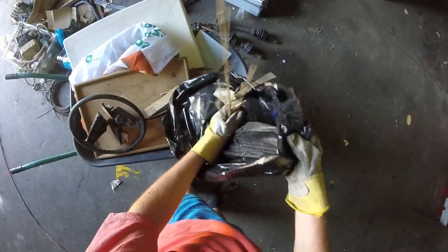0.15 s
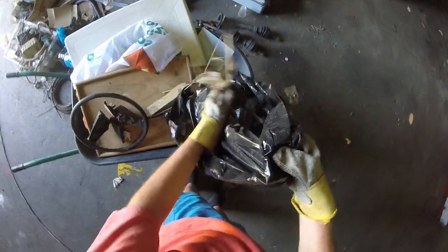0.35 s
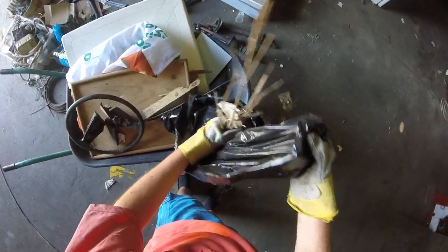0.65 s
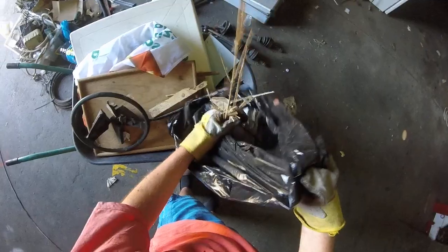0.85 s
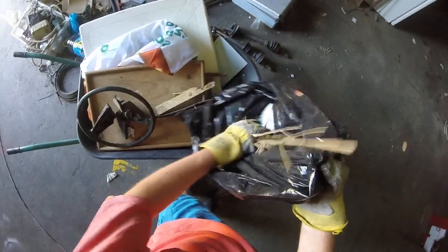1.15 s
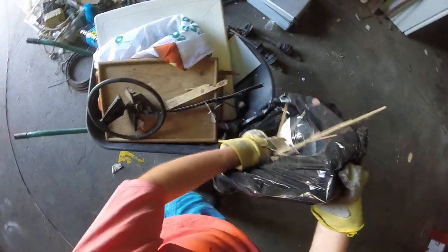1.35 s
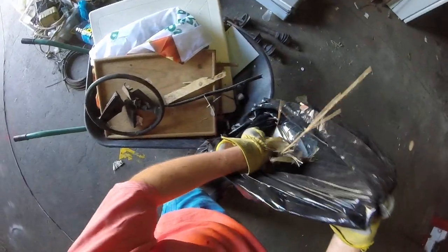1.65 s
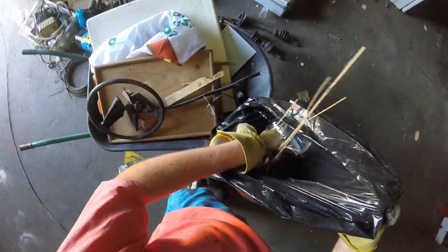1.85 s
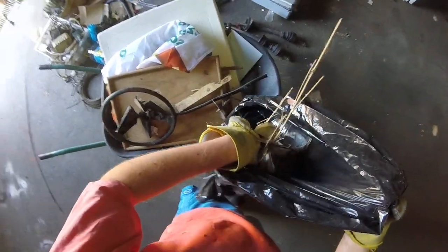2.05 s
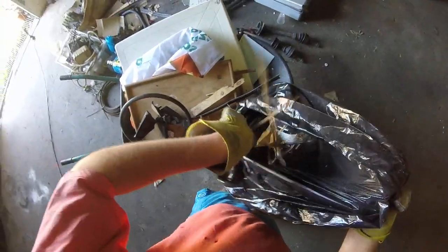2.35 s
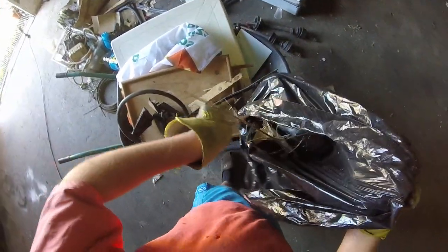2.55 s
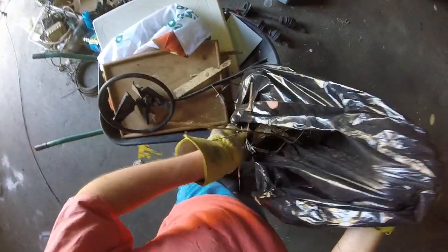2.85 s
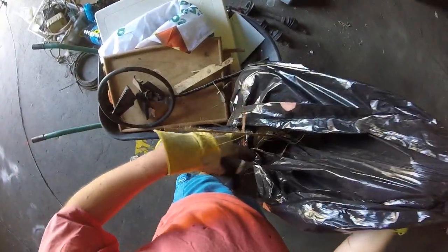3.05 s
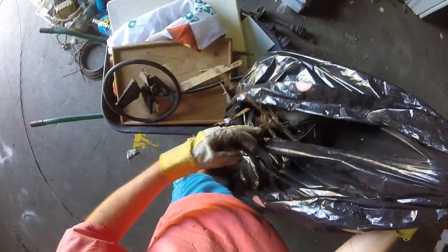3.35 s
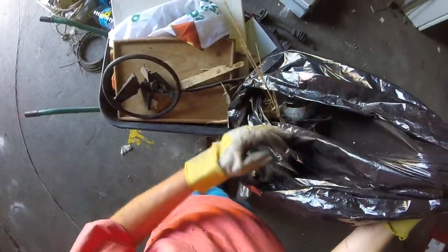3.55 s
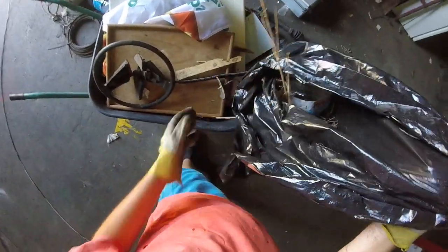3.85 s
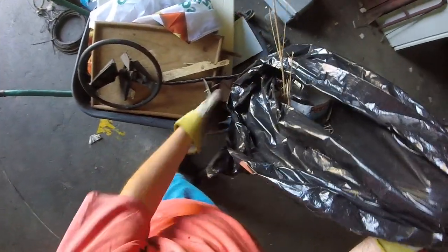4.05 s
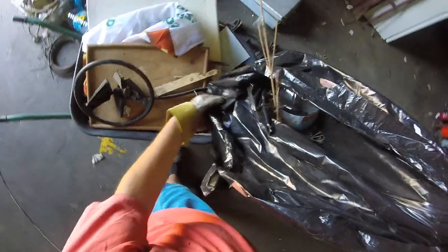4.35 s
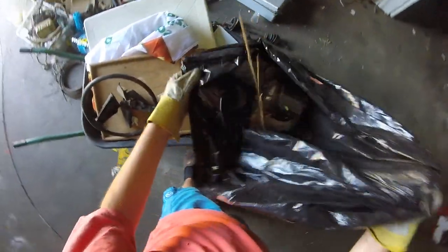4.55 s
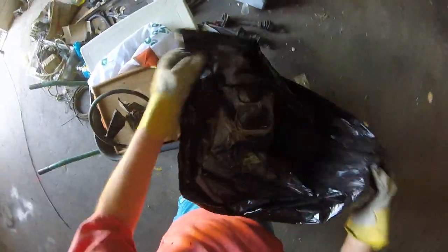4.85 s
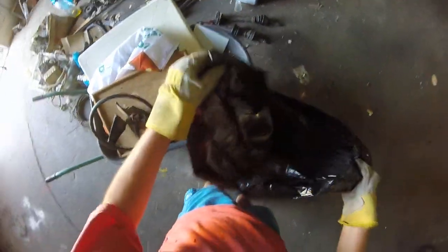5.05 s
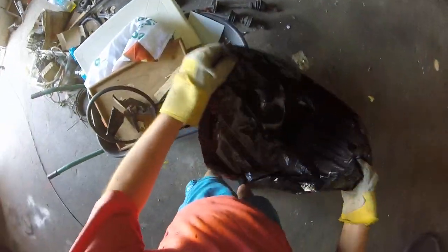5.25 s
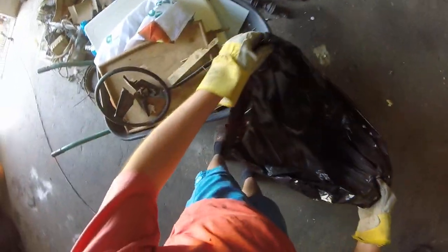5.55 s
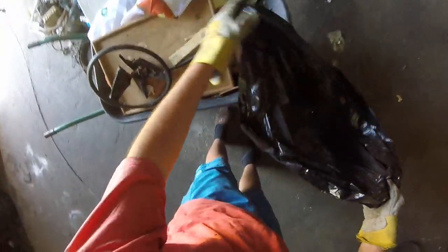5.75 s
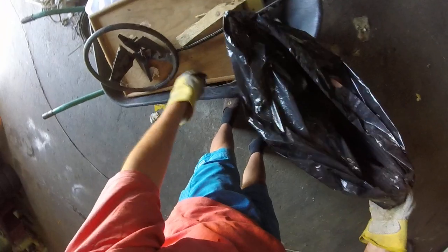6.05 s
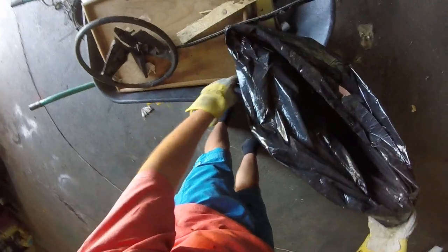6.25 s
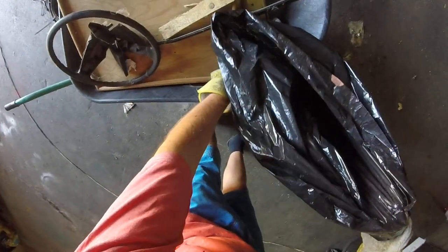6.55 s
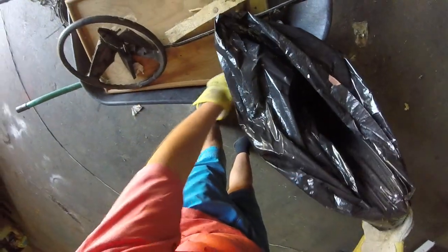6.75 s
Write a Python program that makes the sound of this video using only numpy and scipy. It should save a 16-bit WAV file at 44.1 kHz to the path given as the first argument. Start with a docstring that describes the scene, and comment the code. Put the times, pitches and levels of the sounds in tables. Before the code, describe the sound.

Dense plastic crinkling and snapping comes first, mixed with woody cracks, dull knocks and a low puff of air. It falls to sparse, quiet rustles and ticks. A sudden loud surge of film rattle brings several dull, ringing thumps of debris landing on a tray, then fades to gentle rustling and small knocks. Short room echo, muffled camera-case tone, low steady background.

```python
"""A plastic rubbish bag crinkles and snaps while dry sticks are stuffed into it on a workshop floor.
It is lifted and shaken three times, its load thumping on a loaded wheelbarrow, and pulled open again.
Film, snaps, debris, air puffs and skids are random noise shaped by spectra; sticks and tray ring as fading tones.
The spectra hold the honk near 850 Hz and 2.2 kHz and the dull treble of a body-worn camera's case.
A fading noise tail gives the room's answer, and a low steady background lies underneath."""
import sys
import numpy as np
from scipy import signal
from scipy.fft import rfft, irfft, next_fast_len
from scipy.io import wavfile
from scipy.ndimage import map_coordinates

SR = 44100
rng = np.random.default_rng(int(sys.argv[2]) if len(sys.argv) > 2 else 0)


def persist_wave(psi):
    """Save psi, clipped to +-1, as 16-bit WAV."""
    counts = np.round(np.clip(psi, -1, 1) * 32767).astype(np.int16)
    wavfile.write(sys.argv[1], SR, np.atleast_2d(counts).T)


N = 304717  # length in samples

# Spectrum shape of crinkling, snapping and splintering: f/Hz, relative level/dB
CRINKLE = [(300, -13), (1000, -10), (1400, -12.5), (1750, -6.5), (2050, 1.5), (2350, 0), (2800, -9.5),
           (3600, -8), (4300, -18), (5500, -24.5), (9000, -40.5)]
# Spectrum shape of the high fizz of taut film: f/Hz, relative level/dB
FIZZ = [(2000, -24), (3500, -2), (4400, 0), (4900, -4.5), (5500, -0.5), (6400, -2.5), (7000, -4),
        (8100, -2), (9200, -13.5), (10300, -16), (11500, -13), (13500, -18.5), (15500, -28)]
# Spectrum shape of the load knocking together: f/Hz, relative level/dB
CLATTER = [(60, -21), (200, -7), (290, -5), (375, -5), (520, -2.5), (650, -4), (840, 3), (950, -1),
           (1150, -19.5), (1500, -30.5), (2200, -28.5), (4000, -55.5)]


def amp(db):
    """Turn decibels into gain."""
    return 10 ** (np.asarray(db) / 20)


def unit(x):
    """Scale to an rms of 1."""
    return x / np.sqrt(np.mean(x ** 2) + 1e-20)


def along(points, hz):
    """Read a (frequency, value) table between its points, on a log frequency axis."""
    f, v = np.transpose(points)
    return np.interp(np.log(hz + 1), np.log(f + 1), v)


def wobble(rate):
    """A smooth random curve through `rate` random points a second."""
    points = rng.standard_normal(int(N * rate / SR) + 4)
    return map_coordinates(points, [np.arange(N) * rate / SR])


def coloured(x, spectrum, size=4096):
    """Give x this spectrum with a filter of unit energy that never sounds ahead of its input."""
    hz = np.fft.rfftfreq(size, 1 / SR)
    # folding the cepstrum (the spectrum of the log spectrum) puts the response after time 0
    cepstrum = irfft(np.log(amp(along(spectrum, hz))))
    cepstrum[1:size // 2] *= 2
    cepstrum[size // 2 + 1:] = 0
    response = irfft(np.exp(rfft(cepstrum)))
    return signal.oaconvolve(x, response / np.linalg.norm(response))[:len(x)]


def add(track, s, sound):
    """Mix a sound into the track from time s, in seconds."""
    part = track[max(round(s * SR), 0):][:len(sound)]
    part += sound[:len(part)]


def burst(spectrum, t60):
    """A flurry of tiny contacts: coloured noise that fades by 60 dB in t60 seconds."""
    t = np.arange(SR // 2) / SR
    envelope = amp(-60 * t / t60)
    x = coloured(rng.standard_normal(len(t)) * envelope, spectrum)
    return .5 * x * np.linalg.norm(envelope) / np.linalg.norm(x)


def ring(modes, attack, scatter_db):
    """A struck object rings in several fading tones, with fresh random strengths at each blow."""
    t = np.arange(SR // 2) / SR
    tones = np.zeros(len(t))
    for hz, db, t60 in modes:
        strength_db = db + scatter_db * rng.standard_normal()
        tones += amp(strength_db - 60 * t / t60) * np.sin(2 * np.pi * hz * t)
    return tones * (1 - np.exp(-t / attack))


def buckles(rate, spread_db):
    """Random clicks, `rate` a second; positive spread makes a few large, negative a few small; rms 1."""
    fires = rng.random(N) < rate / SR
    sizes_db = spread_db * np.minimum(rng.standard_exponential(N), 4)
    return unit(fires * amp(sizes_db))


def flutter(impulses, life):
    """Each buckle sets the film fluttering as noise whose level decays over `life` seconds; rms 1."""
    energy = signal.lfilter([1], [1, -np.exp(-2 / (life * SR))], impulses ** 2)
    return unit(np.sqrt(energy) * rng.standard_normal(N))


def background():
    """A low, steady noise lies under everything."""
    # Spectrum shape of the background: f/Hz, relative level/dB
    ambient = [(20, -6), (45, -1.5), (80, -2.5), (150, -8), (300, -9.5), (375, -10), (480, -12.5),
               (850, -13.5), (1250, -19.5), (2200, -23), (4000, -27.5), (8000, -36), (15000, -47)]
    return amp(-54.5) * coloured(rng.standard_normal(N), ambient)


def handling():
    """Crinkling and fizz levels in dB: strokes swell and die over steady effort; taut film fizzes more."""
    # Steady effort of stuffing, a lull, lifting and shaking, opening: t/s, crinkling level/dB
    effort = [(0, -49.5), (.3, -48), (.47, -53.5), (.8, -50.5), (1.06, -54.5), (1.42, -50), (1.76, -56),
              (2.36, -58.5), (2.72, -62.5), (3.72, -64.5), (4.1, -69), (4.27, -68), (4.68, -49),
              (5.5, -48.5), (5.7, -58), (6.2, -61), (6.72, -60), (6.91, -64.5)]
    # Pushes, tugs and shakes, added to the effort: t of the height/s, crinkling level/dB,
    # length scale/s, tautness as extra fizz/dB
    strokes = [(.14, -46, 0.14, 0.5), (0.541, -49, .11, -0.5), (0.736, -51.5, 0.074, -7), (.84, -49, .1, 3),
               (1.152, -46, .09, 0.5), (1.295, -48.5, 0.24, -1), (1.998, -66, 0.097, 10),
               (2.18, -55.5, 0.19, 3), (2.509, -55, 0.18, 3), (2.873, -63.5, 0.15, 3),
               (3.593, -58.5, 0.19, 2.5), (4.313, -64, 0.12, 7), (4.608, -56, 0.16, 7),
               (4.755, -48.5, .22, 3), (5.125, -42.5, 0.24, 1.5), (5.413, -47.5, 0.14, 1),
               (5.838, -51.5, 0.18, 3.5), (6.055, -55, 0.18, -0.5), (6.42, -61, 0.56, 0)]
    rise_share = 0.35  # part of the length scale used while speeding up
    fizz_over_crinkle_db = -7
    t = np.arange(N) / SR
    effort_s, effort_db = np.transpose(effort)
    crinkle = fizz = amp(np.interp(t, effort_s, effort_db)) ** 2
    for s, db, length, taut_db in strokes:
        width = length * np.where(t < s, rise_share, 1 - rise_share)
        power = amp(db) ** 2 * np.exp(-2 * ((t - s) / width) ** 2)
        crinkle = crinkle + power
        fizz = fizz + power * amp(taut_db) ** 2
    return 10 * np.log10(crinkle), 10 * np.log10(fizz) + fizz_over_crinkle_db


def bag(crinkle_db, fizz_db):
    """Creases buckle in clumps, heard at once in the big folds, the crinkles and the taut film."""
    # Spectrum shape of the big folds: f/Hz, relative level/dB
    fold_shape = [(40, -28.5), (110, -10), (180, -8), (300, -8.5), (450, -7), (620, -4), (760, 0.5),
                  (870, 2.5), (960, -5), (1080, -17), (1300, -21.5), (1800, -33.5), (3500, -67.5)]
    firm_db = -57  # crinkling under a firm grip
    fold_over_crinkle_db = 5.5  # at a firm grip
    fold_growth = 0.92  # dB of folds per dB of crinkling
    fold_db = firm_db + fold_over_crinkle_db + fold_growth * (crinkle_db - firm_db)
    clumps = unit(amp(0.58 * wobble(60)))
    creases = buckles(rate=400, spread_db=4.5)

    def film(share, life):
        """The shared large creases, mixed with fresh fine ones, set the film fluttering."""
        fine = buckles(rate=2500, spread_db=-1.5)
        return clumps * flutter(share * creases + fine, life)

    folds = coloured(film(share=0.46, life=0.0023), fold_shape)
    crinkling = coloured(film(share=.8, life=.0016), CRINKLE)
    fizzing = coloured(film(share=.7, life=.0014), FIZZ)
    return amp(fold_db) * folds + amp(crinkle_db) * crinkling + amp(fizz_db) * fizzing


def workshop(x):
    """The room answers with a delayed noise tail in which each frequency dies at its own speed."""
    # How long the room rings: f/Hz, time to fade by 60 dB/s
    fading = [(150, 0.79), (900, 0.71), (3000, 1), (12000, 0.56)]
    hz, t, z = signal.stft(rng.standard_normal(SR // 2), SR, nperseg=256)
    decay = amp(-60 * t / along(fading, hz)[:, None])
    tail = signal.istft(z * decay, SR, nperseg=256)[1]
    delayed = np.pad(x, (SR // 150, 0))  # 1/150 s
    return signal.fftconvolve(delayed, tail / np.linalg.norm(tail))[:N]


def snaps(crinkle_db):
    """Single creases flip over with a short crack; lesser ones come by chance, following the handling."""
    # The sharpest snaps of creases and twigs: t/s, level before the trim/dB,
    # fizz relative to the snap before the trim/dB
    sharpest = [(0.1335, -35, -10), (0.334, -25.5, -26), (1.1163, -30.5, -4), (1.1598, -27, 1.5),
                (2.8474, -44, -10), (3.7943, -40, -6), (4.6224, -31, -8), (4.8687, -32, -1),
                (5.031, -27, -17), (5.0577, -33, -5), (5.0903, -24, -6), (5.8253, -38, -11)]
    rate = 2  # chance snaps per second
    over_crinkle_db, scatter_db, lesser_fizz_db = 4, 1.5, -6  # chance snaps, before the trims
    trim_db, fizz_trim_db = -4, -4
    out = np.zeros(N)
    lesser = []
    for i in np.flatnonzero(rng.random(N) < rate / SR):
        db = crinkle_db[i] + over_crinkle_db + scatter_db * rng.standard_normal()
        lesser.append((i / SR, db, lesser_fizz_db))
    for s, db, fizz_db in [*sharpest, *lesser]:
        crack = burst(CRINKLE, t60=0.026)
        fizz = amp(fizz_db + fizz_trim_db) * burst(FIZZ, t60=0.036)
        add(out, s, amp(db + trim_db) * (crack + fizz))
    return out


def knocks():
    """Loose pieces knock together in the bag with a short clatter and a low thud."""
    # Light knocks: t/s, level before the boost/dB, low thud relative to the clatter/dB
    light_knocks = [(0.134, -41, -20), (0.222, -32.5, -7), (0.277, -28, -5), (0.333, -40, -9),
                    (0.847, -29, 0), (1.102, -23.5, -6), (1.159, -30.5, -1.5), (1.231, -27, -7),
                    (1.364, -33, -6), (2.646, -38.5, -12), (3.202, -44.5, 4), (3.794, -37.5, -4.5),
                    (4.655, -32, -20), (5.826, -36.5, -10), (6.26, -41.5, 1.5), (6.395, -46, -3),
                    (6.698, -36, -7), (6.713, -36.5, -9)]
    # Spectrum shape of the thud: f/Hz, relative level/dB
    thud_shape = [(40, -17.5), (150, 6), (400, -8), (600, 12), (1200, -54.5)]
    boost_db = 2.5
    out = np.zeros(N)
    for s, db, thud_db in light_knocks:
        clatter = burst(CLATTER, t60=0.075)
        thud = amp(thud_db) * burst(thud_shape, t60=0.089)
        add(out, s, amp(db + boost_db) * (clatter + thud))
    return out


def cracks():
    """Sticks pushed down splinter as a noise burst and clack as a bundle of short tones."""
    # Cracks: t/s, splinter level/dB, clack level before the boost/dB
    stick_cracks = [(0.812, -35, -31), (0.8172, -20, -47), (0.823, -21, -29), (0.8265, -35, -10.5),
                    (0.853, -34, -23), (0.873, -49, -31), (0.934, -44, -32), (0.968, -54, -29),
                    (0.997, -45, -24.5), (1.023, -47, -24)]
    # Tones of the bundle of sticks: f/Hz, level before random scatter/dB, time to fade by 60 dB/s
    sticks = [(511, -18.5, 0.091), (624, -12.5, 0.066), (783, -0.5, 0.035), (857, 2, 0.041),
              (890, -40, 0.057)]
    clack_boost_db = 4
    out = np.zeros(N)
    for s, splinter_db, clack_db in stick_cracks:
        add(out, s, amp(splinter_db) * burst(CRINKLE, t60=0.063))
        clack = ring(sticks, attack=0.0029, scatter_db=2.2)
        add(out, s, amp(clack_db + clack_boost_db) * clack)
    return out


def puffs():
    """The billowing bag pushes air at the microphone, which rumbles briefly."""
    # Puffs of air: t/s, level/dB
    air_puffs = [(1.136, -33), (1.16, -43), (1.348, -39), (6.589, -56)]
    # Spectrum shape of a puff: f/Hz, relative level/dB
    puff_shape = [(20, -3), (40, 7), (80, -8), (160, -4), (300, -19), (1000, -70)]
    out = np.zeros(N)
    for s, db in air_puffs:
        add(out, s, amp(db) * burst(puff_shape, t60=0.18))
    return out


def ticks():
    """A thin twig flicks against the film and buzzes for a few milliseconds near its own pitch."""
    # Ticks: t/s, pitch f/Hz, level/dB
    twig_ticks = [(2.02, 4330, -38.5), (2.531, 2020, -33), (3.527, 2200, -40.5), (4.156, 3280, -50),
                  (4.187, 3400, -45), (4.302, 2080, -41)]
    out = np.zeros(N)
    for s, hz, db in twig_ticks:
        band = [(hz / 4, -60), (hz / 2, -26), (hz * .87, -8), (hz, 0),
                (hz * 1.13, -10), (hz * 2, -34), (hz * 3, -60)]
        add(out, s, amp(db) * burst(band, t60=0.022))
    return out


def slides():
    """Debris skids over the film with a fine, narrow rasp that fades as it slows."""
    # Skids: start t/s, length/s, level before the fade/dB, rise and final fade-out time/s
    skids = [(3.047, 0.52, -58.5, .085), (6.228, 0.37, -57, 0.022)]
    # Spectrum shape of the rasp: f/Hz, relative level/dB
    rasp_shape = [(1500, -31), (2800, -2.5), (3400, 2.5), (3900, 4), (4250, -10), (5500, -9), (7000, -45),
                  (12000, -51)]
    fade_db_per_s = 16
    level = np.zeros(N)
    for s, length, db, rise in skids:
        t = np.arange(round(length * SR)) / SR
        fading = amp(db - fade_db_per_s * np.maximum(t - rise, 0))
        ramps = np.minimum(np.minimum(t, length - t) / rise, 1)
        add(level, s, fading * ramps)
    slips = buckles(rate=1500, spread_db=2)
    return level * coloured(flutter(slips, life=0.0022), rasp_shape)


def thumps():
    """The shaken load lands and settles: it clatters, rings the barrow's tray and gives one low push."""
    # Landings: t/s, clatter/dB, tray/dB, heavy push/dB (all levels before the trims)
    landings = [(5.088, -18, -33.5, -37), (5.26, -19, -26, -25.5), (5.4524, -18.5, -23.5, -34),
                (5.4935, -22, -30.5, -44), (5.518, -32, -35.5, -32)]
    # Tones of the wheelbarrow tray: f/Hz, level before random scatter/dB, time to fade by 60 dB/s
    tray = [(130, -3, 0.23), (152.7, -9, 0.63), (185, -4.5, 0.35), (270, -5, 0.13), (370.5, 1, 0.24),
            (595, -25, 0.11), (800, -14, 0.11), (847, 4, 0.22), (870, -5, 0.12)]
    clatter_trim_db, tray_trim_db, push_trim_db = 5, -3, 5
    push_delay = 0.0064  # s
    out = np.zeros(N)
    u = np.arange(SR // 4) / SR / 0.0019  # time in units of 1.9 ms
    push = u * (2 - u) * np.exp(-u)  # one swing up, then one down
    for s, clatter_db, tray_db, push_db in landings:
        add(out, s, amp(clatter_db + clatter_trim_db) * burst(CLATTER, t60=0.1))
        add(out, s, amp(tray_db + tray_trim_db) * ring(tray, attack=0.0056, scatter_db=1.5))
        add(out, s + push_delay, amp(push_db + push_trim_db) * push)
    return out


def scene():
    """Bag and debris sound in the room; the air puffs and background are added without its answer."""
    crinkle_db, fizz_db = handling()
    rustle = bag(crinkle_db, fizz_db) + slides()
    hits = snaps(crinkle_db) + knocks() + cracks() + ticks() + thumps()
    room = workshop(amp(-10) * rustle + amp(-8) * hits)
    return (rustle + hits + room + puffs() + background())[None]


def record(dry):
    """The camera keeps nothing above its band limit."""
    top_hz = 15350
    size = next_fast_len(N + SR // 2)
    kept = np.fft.rfftfreq(size, 1 / SR) < top_hz
    return irfft(rfft(dry, size) * kept, size)[..., :N]


dry = scene()
out = record(dry)
persist_wave(out)
```